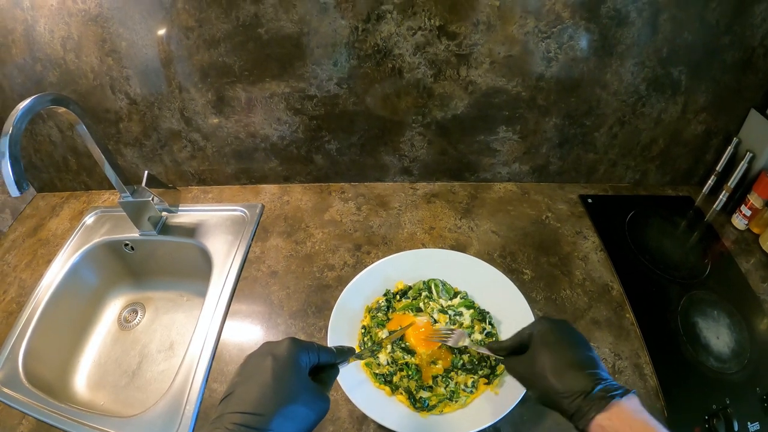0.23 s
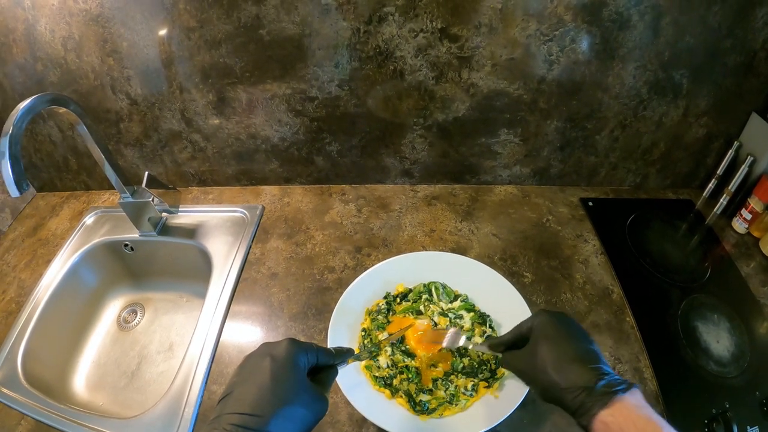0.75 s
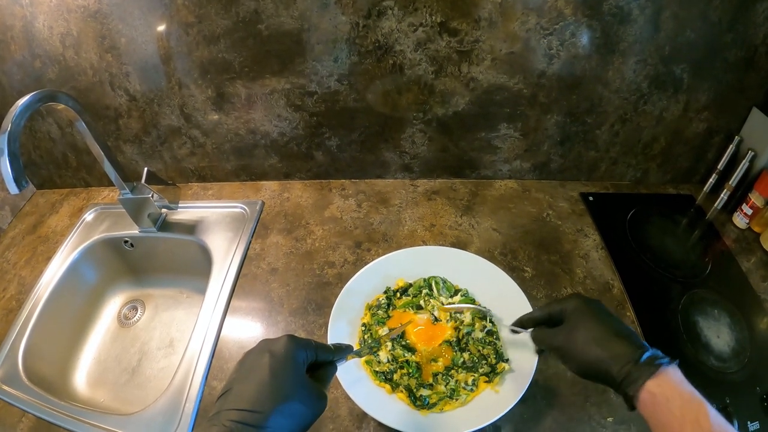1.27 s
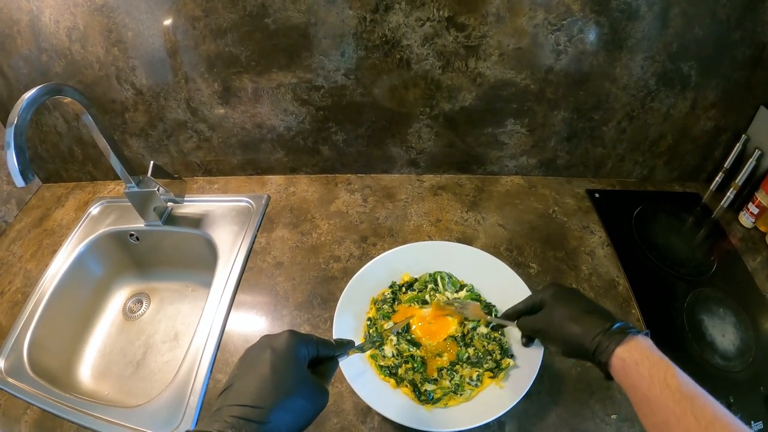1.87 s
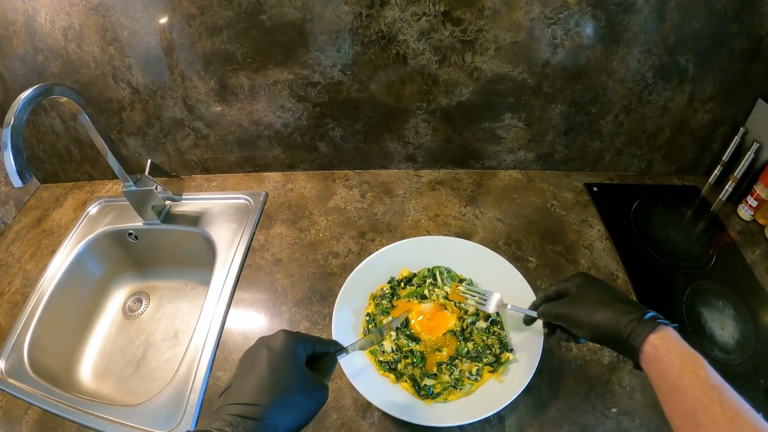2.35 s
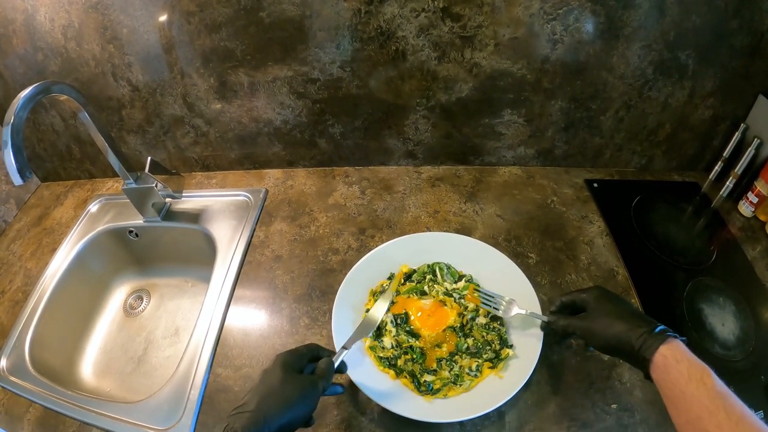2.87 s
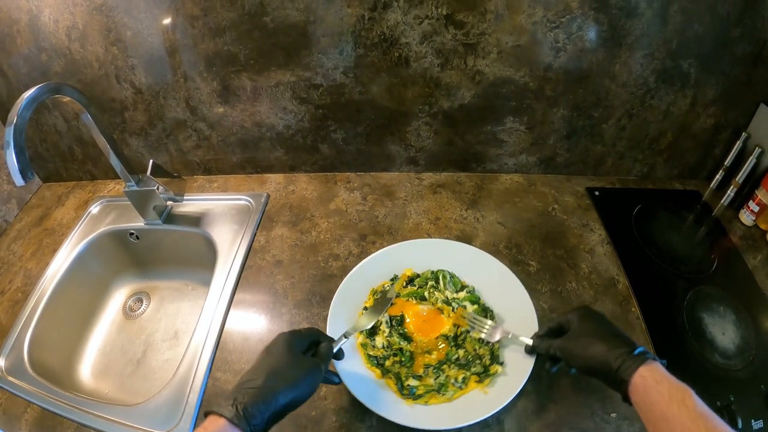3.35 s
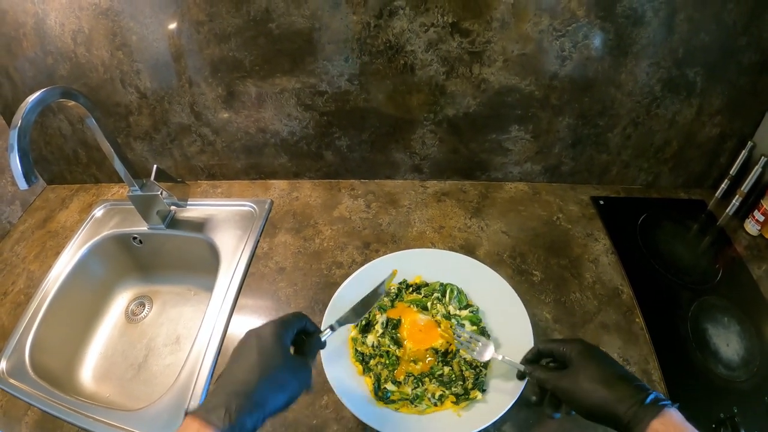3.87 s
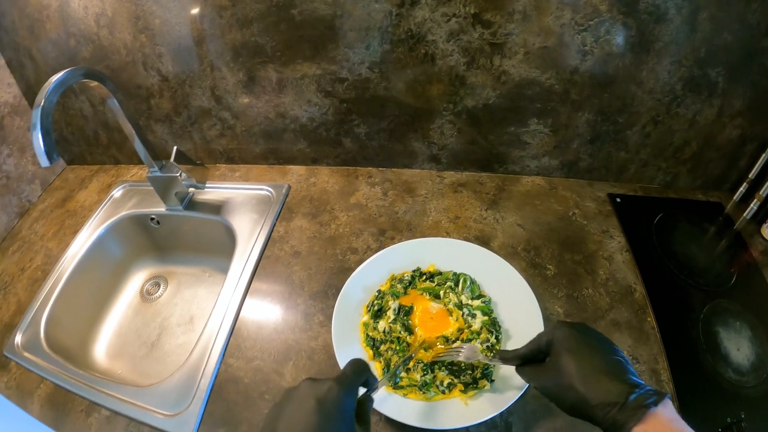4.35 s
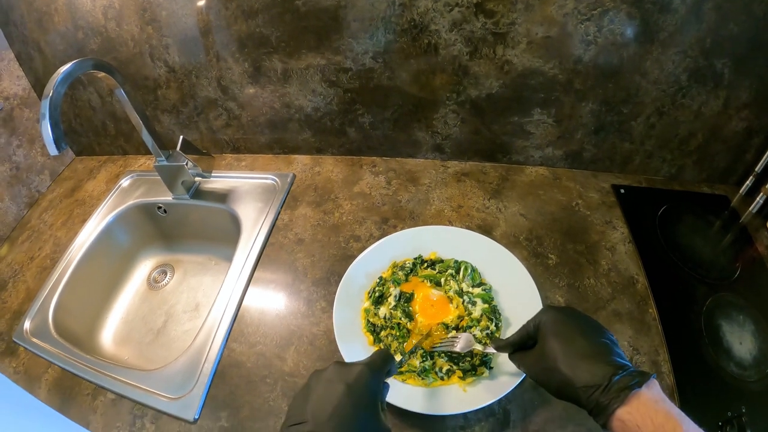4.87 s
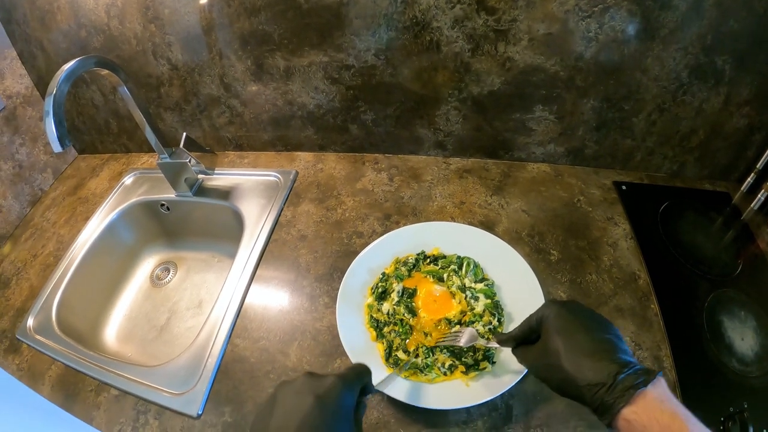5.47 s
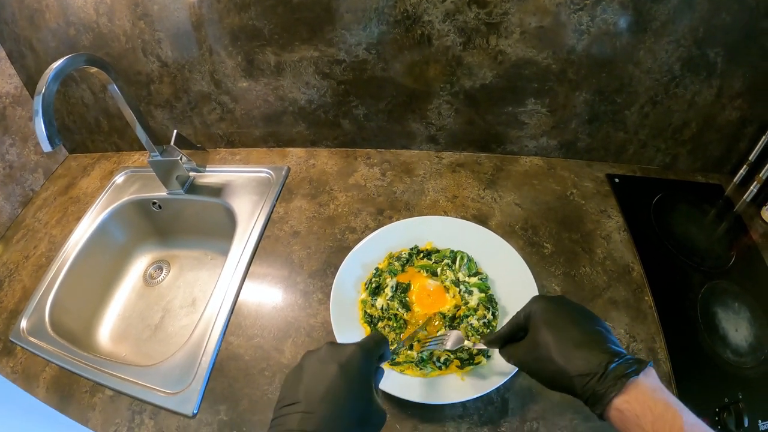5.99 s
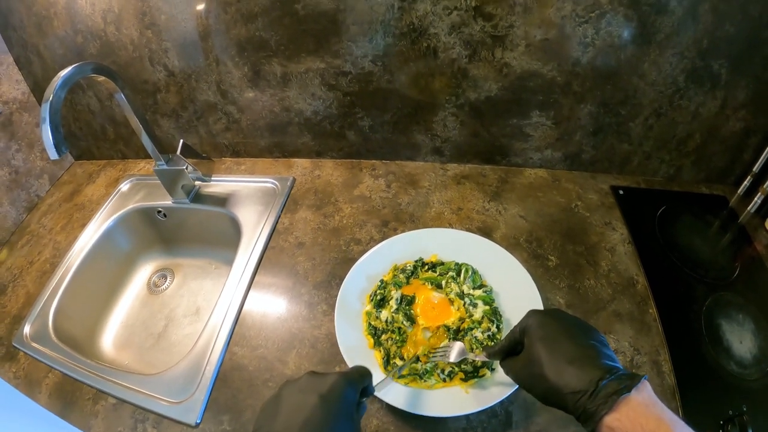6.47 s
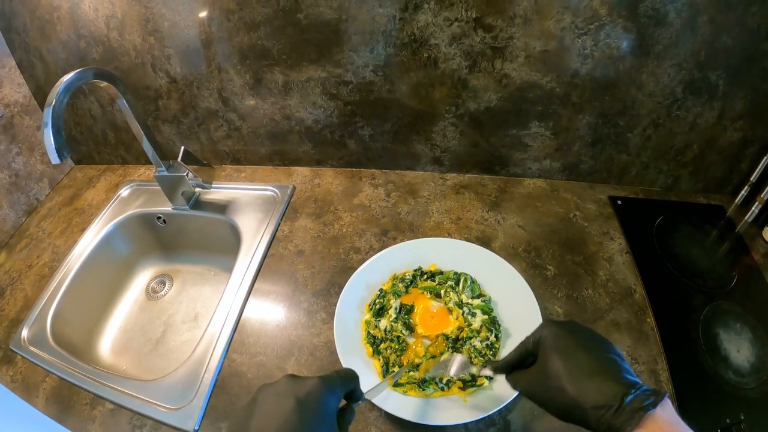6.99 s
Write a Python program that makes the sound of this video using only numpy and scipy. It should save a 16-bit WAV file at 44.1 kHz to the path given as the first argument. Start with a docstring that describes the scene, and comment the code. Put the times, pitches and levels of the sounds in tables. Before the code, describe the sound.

Close kitchen cutlery: faint wet scraping, a gritty plate shove, then sharp steel-on-china knocks and small ticks above a steady low hum.

```python
"""A fork and knife work in soft, wet food on a ceramic plate, close to two microphones in a small kitchen.
Shoves grind the plate round on the counter; later steel hits the china in three hard blows, each with a
weaker one after it. Blows ring tuned modes of plate and counter and come back from a near wall and worktop;
random slips make the grinding, squish and rasps, and short noise bursts the ticks and pops.
Behind it an appliance hums as steady tones over rumble and faint hiss."""
import sys
import numpy as np
from scipy import signal
from scipy.fft import rfft, irfft, next_fast_len
from scipy.io import wavfile

SR = 44100
rng = np.random.default_rng(int(sys.argv[2]) if len(sys.argv) > 2 else 0)


def transcribe(signal):
    """Save signal, clipped to [-1, 1], as a 16-bit WAV file at the path in sys.argv[1]."""
    frames = np.atleast_2d(signal).T
    limited = np.clip(frames, -1, 1)
    pcm = np.round(limited * 32767).astype(np.int16)
    wavfile.write(sys.argv[1], SR, pcm)


N = 318843
TIME = np.arange(N) / SR  # seconds
RING = TIME[:SR // 2]  # time axis of one struck sound, seconds
TICK_T60_S = .035  # decay of a light touch of steel on glaze


def amp(db):
    """Decibels to gain."""
    return 10 ** (np.asarray(db) / 20)


def evened(x):
    """Scales to rms 1."""
    return x / np.sqrt(np.mean(x ** 2) + 1e-20)


def sized(x, span):
    """Scales a short sound to the energy that rms 1 has over span seconds."""
    return x / np.sqrt(np.sum(x ** 2) / (span * SR) + 1e-20)


def read(points, hz):
    """Reads a table of (Hz, value) on a log-frequency axis."""
    f, value = np.transpose(points)
    return np.interp(np.log(hz + 1), np.log(f + 1), value)


def coloured(x, gain):
    """Filters by a gain that is a function of frequency."""
    size = next_fast_len(x.shape[-1], True)
    spectrum = rfft(x, size) * gain(np.fft.rfftfreq(size, 1 / SR))
    return irfft(spectrum, size)[..., :x.shape[-1]]


def low_pass(x, corner_hz, order):
    """Keeps what lies below the corner, without shifting phase."""
    return coloured(x, lambda hz: 1 / (1 + (hz / corner_hz) ** order))


def hill(centre_hz, octaves):
    """A rounded band with soft skirts."""
    def gain(hz):
        away = np.log2((hz + 1) / centre_hz) / (2 * octaves)
        return 1 / (1 + away ** 2 + away ** 4 / 2) ** 2
    return gain


def wander(rate):
    """Slow chance of rms 1, with about rate turns a second."""
    coarse = TIME[::64]
    hz = np.fft.rfftfreq(len(coarse), coarse[1])
    noise = rng.standard_normal(len(coarse))
    slow = irfft(rfft(noise) / (1 + (hz / rate) ** 4), len(coarse))
    return np.interp(TIME, coarse, evened(slow))


def grains(per_s, spread_db):
    """A random train of clicks of uneven size."""
    size = amp(spread_db * np.minimum(rng.exponential(1, N), 4))
    return evened(size * rng.standard_normal(N) * (rng.random(N) < per_s / SR))


def arch(start, length):
    """A push that swells and lets go."""
    return np.sin(np.pi * np.clip((TIME - start) / length, 0, 1))


def push(start, length, attack, release):
    """Pressure that builds from the start, holds to the end of its length and then lets go."""
    rise = np.clip((TIME - start) / attack, 0, 1)
    fall = np.clip(1 - (TIME - start - length) / release, 0, 1)
    return rise * fall


def add(mix, s, sound, pan_db=0):
    """Places a sound in the stereo mix; positive pan leans left."""
    part = mix[:, round(s * SR):][:, :len(sound)]
    part += amp([[pan_db / 2], [-pan_db / 2]]) * sound[:part.shape[1]]


def echoed(x):
    """The sound with its first reflections, delayed by the extra path to the microphone."""
    # Echoes off wall and worktop. Each row: delay in seconds, gain.
    reflections = [(.0041, 1.29), (.0058, 0.15), (.0087, 0.58), (0.0135, .25), (0.0154, 0.6)]
    return x + sum(gain * np.pad(x, (round(delay * SR), 0))[:len(x)] for delay, gain in reflections)


def decay(t60):
    """Exponential dying away by 60 dB in t60 seconds."""
    return np.exp(-np.log(1000) * RING / t60)


def mode(hz, t60):
    """One dying vibration, with the quick swell of a contact that is not quite instant."""
    swell = 1 - np.exp(-RING / 0.0002)
    return swell * np.sin(2 * np.pi * (hz * RING + rng.random())) * decay(t60)


def burst(centre_hz, octaves, t60):
    """A dying puff of noise in a rounded band."""
    return coloured(rng.standard_normal(len(RING)), hill(centre_hz, octaves)) * amp(-60 * RING / t60)


def blows():
    """A crack at the contact, the plate's modes as that spot excites them, and a thump in the counter."""
    # Steel on china. Each row: start in seconds, spot struck, force in dB, highest Hz the contact drives,
    # crack level in dB, crack centre in Hz, counter thump in dB, left over right in dB.
    strikes = [(4.878, 0, 2, 14000, -56, 2370, -48, 1.5), (5.1644, 0, -18, 2417, -78, 2180, -72.5, 2),
               (5.4587, 1, 1, 18000, -39.5, 2720, -38, 1), (5.5070, 2, -17.5, 2760, -65, 2250, -47, 4),
               (6.0775, 2, 1.5, 15100, -35, 3000, -36, 0.5), (6.138, 0, -4, 3000, -47.5, 2110, -48.5, 2.5)]
    # The plate's modes. Each row: Hz, t60 of the damping by the steel in seconds,
    # level in dB when struck at spot 0, at spot 1, at spot 2.
    plate_modes = [(611, 0.06, -47, -44, -45), (894, 0.06, -61, -56, -42), (1677, 0.06, -48, -42, -42),
                   (1787, 0.06, -37, -41, -27), (1908, 0.06, -37, -42, -34), (1992, 0.06, -44, -43, -29),
                   (2070, 0.06, -49, -46, -34), (2223, 0.06, -53, -40, -47), (2541, 0.06, -61, -40, -44),
                   (2608, 0.06, -67, -39, -55), (2689, 0.06, -61, -40, -42), (2762, 0.06, -59, -40, -40),
                   (2834, 0.06, -54, -41, -40), (2947, 0.06, -55, -47, -40), (3846, 0.06, -55, -38, -43),
                   (3957, 0.06, -54, -43, -47), (4091, 0.06, -54, -53, -41), (4212, 0.06, -43, -39, -37),
                   (4395, 0.06, -46, -27, -34), (4527, 0.06, -61, -39, -49), (4710, 0.06, -61, -44, -41),
                   (5041, 0.06, -50, -41, -32), (6611, 0.05, -56, -45, -52), (6767, 0.05, -54, -49, -43),
                   (6961, 0.05, -56, -42, -45), (7192, 0.05, -61, -53, -46), (8506, 0.05, -74, -45, -49),
                   (8834, 0.05, -66, -57, -45), (10785, 0.05, -72, -50, -54), (11189, 0.05, -62, -53, -56)]
    # The plate rocking on the counter. Each row: Hz, t60 in seconds, relative level in dB.
    counter_modes = [(188.7, 0.11, 1), (316.5, 0.11, 2), (384, 0.12, -2.5), (421.6, 0.18, 2.5),
                     (464, 0.14, 1.5), (714, .12, -22), (1337, .15, -9.5)]
    shimmer_db = -12.5  # against the crack
    out = np.zeros((2, N))
    for s, spot, force_db, hard_hz, crack_db, crack_hz, thump_db, pan_db in strikes:
        ring = 0
        for hz, t60, *spot_db in plate_modes:
            # the steel damps the plate while they touch; what is left rings on freely
            free_t60 = 0.29 * (2000 / max(hz, 2000)) ** .6
            damping = amp(-28.0) + decay(t60)
            # a soft contact cannot drive the high modes
            weight = amp(force_db + spot_db[spot]) / np.sqrt(1 + (hz / hard_hz) ** 4)
            ring = ring + weight * sized(echoed(mode(hz, free_t60) * damping), span=0.022)
        crack = sized(echoed(burst(crack_hz, octaves=0.98, t60=.016)), span=0.037)
        # a dense noisy shimmer, the room's answer to the crack, dies away under the ringing modes
        shimmer = amp(shimmer_db) * sized(burst(3500, octaves=.9, t60=0.21), span=0.023)
        rocking = sum(amp(db) * mode(hz, t60) for hz, t60, db in counter_modes)
        thump = sized(rocking * (1 - np.exp(-RING / 0.011)), span=0.025)
        add(out, s, ring + amp(crack_db) * (crack + shimmer) + amp(thump_db) * thump, pan_db)
    return out


def cutlery():
    """The tines ring briefly, damped by the hand; lighter contacts only tick, and short slides rasp."""
    # The fork's tines. Each row: Hz, relative level in dB, t60 in seconds.
    tine_modes = [(2850, 10, 0.026), (3040, -14, .035), (6020, -2, 0.037), (6260, -1.5, .045),
                  (6720, 1, 0.033), (7600, -10, 0.045), (8450, -19, 0.046), (11840, -11, 0.022)]
    # Knife against fork. Each row: start in seconds, ringing tines in dB, contact click in dB.
    tings = [(6.2860, -39.5, -49), (6.328, -66, -55), (6.371, -51, -52)]
    # Steel touches the glaze lightly. Each row: start in seconds, level in dB, centre in Hz, width in octaves.
    ticks = [(1.4961, -64, 4670, .24), (1.5192, -63.5, 3930, 0.51), (2.533, -59, 5240, 0.23),
             (2.689, -59, 5010, 0.33), (2.7809, -70, 4330, 0.24), (2.842, -62.5, 4720, 0.38),
             (3.2904, -69, 5270, 0.41), (6.3326, -49.5, 2050, 0.25), (6.4403, -58.5, 2740, 0.33),
             (6.5397, -57, 2450, 0.73), (6.65, -64, 4380, 0.32), (6.8417, -63, 2330, .26),
             (6.991, -65.5, 4550, 0.41), (7.0741, -50, 6880, 0.18)]
    # Steel slides on the glaze. Each row: start in seconds, length in seconds, centre in Hz, level in dB.
    slides = [(1.468, 0.064, 4200, -75), (4.186, 0.07, 3620, -56), (6.432, 0.021, 3200, -57)]
    out = np.zeros((2, N))
    for s, tines_db, click_db in tings:
        tines = sized(sum(amp(mode_db) * mode(hz, t60) for hz, mode_db, t60 in tine_modes), span=0.013)
        click = sized(burst(5260, octaves=0.51, t60=0.031), span=0.013)
        add(out, s, amp(tines_db) * tines + amp(click_db) * click)
    for s, db, centre_hz, octaves in ticks:
        add(out, s, amp(db) * sized(burst(centre_hz, octaves, TICK_T60_S), span=0.021), pan_db=1.0)
    slips = grains(per_s=3000, spread_db=1.5)
    for s, length, centre_hz, db in slides:
        out += amp(db) * arch(s, length) * evened(coloured(slips, hill(centre_hz, octaves=0.58)))
    return out


def food():
    """Wet food tears and smears: a soft squish, finer bursting films above it, stray ticks and larger pops."""
    # Fork or knife presses through the food.
    # Each row: start in seconds, length in seconds, squish in dB, wet fizz in dB; both are trimmed below.
    strokes = [(1.28, 0.2, -67.5, -73), (2.355, 0.46, -60, -67.5), (2.815, 0.33, -66, -63.5),
               (3.837, 0.37, -59.5, -76), (4.14, 0.76, -65, -78), (5.066, 0.14, -60.5, -72),
               (5.242, 0.14, -63, -75.5), (5.52, 0.068, -74, -60), (6.02, 0.097, -60.5, -85.5),
               (6.49, 0.15, -66.5, -86), (6.688, 0.076, -75, -60.5), (6.78, 0.086, -61.5, -78),
               (6.998, .11, -64.5, -79)]
    # A wet film of food snaps. Each row: start in seconds, level in dB, centre in Hz.
    pops = [(1.9683, -75, 8500), (2.0526, -73.5, 9800), (2.261, -66, 11300), (5.0977, -56, 11300),
            (5.1219, -61, 8000), (5.3104, -68, 7000), (5.3363, -76, 10020)]
    rise_share, fall_share = .45, 0.49  # of the stroke's length: a long stroke builds and eases slowly
    stray_per_s, stray_db, stray_hz = 7, -5, 5000  # faint ticks during strokes; level follows the squish
    squish, fizz = np.zeros((2, N))
    for start, length, squish_db, fizz_db in strokes:
        pressure = push(start, length, rise_share * length, fall_share * length)
        squish += amp(squish_db) * pressure
        fizz += amp(fizz_db) * pressure
    smear = evened(coloured(grains(per_s=6600, spread_db=-0.5), hill(4600, octaves=0.79)))
    films = evened(coloured(grains(per_s=1300, spread_db=2.5), hill(6800, octaves=1.0)))
    touches = squish * rng.uniform(.4, 1, N) * (rng.random(N) < stray_per_s / SR)
    tick = sized(burst(stray_hz, octaves=.45, t60=TICK_T60_S), span=0.013)
    strays = signal.oaconvolve(touches, tick)[:N]
    unevenness = amp(1.2 * wander(rate=15))
    wet = unevenness * (amp(-7) * squish * smear + amp(-8.5) * fizz * films)
    out = (wet + amp(stray_db) * strays) * np.ones((2, 1))
    for s, db, centre_hz in pops:
        add(out, s, amp(db) * sized(burst(centre_hz, octaves=.55, t60=.02), span=0.017), pan_db=3.5)
    return out


def turning():
    """Grit under the foot ring slips in dense tiny jerks that drive the resonances of plate and counter."""
    # The hand shoves the plate round on its foot.
    # Each row: start in seconds, length in seconds, level in dB before it sags.
    shoves = [(3.314, 0.37, -38.5), (3.577, 0.24, -38), (3.783, 0.073, -42)]
    # Broad colour of the grinding. Each row: Hz, relative level in dB.
    grind_colour = [(150, -40), (250, -29), (448, -1), (620, -16.5), (888, -20), (1040, -4), (1320, -3.5),
                    (2660, -7.5), (3160, -14), (4300, -20.5), (5650, -17.5), (9610, -36.5), (15000, -72)]
    # Resonances of plate and counter. Each row: Hz, least width in Hz, relative level in dB.
    grind_peaks = [(328, 23, -4), (732, 18, -4), (894, 77, 0), (1320, 26, -1), (1650, 48, -3),
                   (2650, 50, -4), (3550, 160, -10), (3950, 47, -16), (4200, 17, -8), (4390, 41, -6),
                   (4710, 56, -15), (5070, 65, -9), (6140, 68, -13), (6670, 150, -15), (7880, 89, -15),
                   (9290, 88, -17), (10700, 29, -27), (11800, 61, -30)]
    # The foot catches and one resonance sings.
    # Each row: start in seconds, length in seconds, Hz, level in dB.
    catches = [(3.349, 0.13, 897, -40), (3.6, 0.087, 1320, -51), (3.808, 0.048, 732, -41.5),
               (3.809, 0.068, 4400, -43)]
    attack_s, release_s = 0.024, 0.047
    sag_db_per_s = 17  # friction eases once the plate is moving
    start_s = 0.083  # the plate at rest takes this long to get up to speed
    grit_db = -7  # treble grit against the body of the grinding
    efforts = []
    for s, length, db in shoves:
        sagging_db = db - sag_db_per_s * np.maximum(TIME - s, 0)
        efforts.append(push(s, length, attack_s, release_s) * amp(sagging_db))
    effort = np.max(efforts, axis=0)
    speed = np.clip((TIME - shoves[0][0]) / start_s, 0, 1)
    jerks = grains(per_s=5000, spread_db=0.0) * amp(1.64 * wander(rate=28))
    broad = evened(coloured(jerks, lambda hz: amp(read(grind_colour, hz))))
    # as the contact travels round the rim, groups of resonances take turns
    sharp = 0
    for k in range(3):
        def resonances(hz):
            return sum(amp(db) / (1 + 2j * (hz - f) / max(width, .012 * f))
                       for f, width, db in grind_peaks[k::3])
        sharp = sharp + coloured(jerks, resonances) * amp(3.3 * wander(rate=9.5))
    rub = evened(broad + amp(-2.0) * evened(sharp))
    body = low_pass(rub, 3000, order=8)
    grit = low_pass(rub - body, 13000, order=8)
    out = effort * speed * (evened(body) + amp(grit_db) * evened(grit))
    for start, length, hz, db in catches:
        song = np.sin(2 * np.pi * hz * TIME + 1.0 * wander(rate=47))
        out += amp(db) * arch(start, length) * song
    return out * amp([[.1], [-.1]])  # a hair to the left


def room(x, likeness):
    """A diffuse tail of sparse taps, each band dying at its own speed; likeness is what left and right share."""
    # Decay of the kitchen. Each row: Hz, t60 in seconds.
    room_t60 = [(200, 0.28), (800, 0.68), (2000, 0.57), (4500, 0.42), (8000, 0.36), (14000, 0.18)]
    taps = rng.choice([-1., 1.], (3, SR)) * (rng.random((3, SR)) < 4000 / SR)
    pair = np.sqrt(likeness) * taps[0] + np.sqrt(1 - likeness) * taps[1:]
    hz, t, z = signal.stft(pair, SR, nperseg=256)
    tail = signal.istft(z * amp(-60 * t / read(room_t60, hz)[:, None]), SR, nperseg=256)[1]
    tail = np.pad(tail, ((0, 0), (round(.008 * SR), 0)))  # the tail sets in after 8 ms
    return signal.fftconvolve(x, tail / np.linalg.norm(tail[0]), axes=1)[:, :N]


def noise_pair(spectrum):
    """Steady room noise of rms 1: the two microphones share its bass and less of its treble."""
    # Likeness of the noise at the two microphones. Each row: Hz, shared part of the power from 0 to 1.
    noise_likeness = [(60, .99), (130, .96), (290, .88), (640, .7), (1400, .57), (3100, .45), (7000, .6),
                      (15000, .45)]
    shared, left, right = rng.standard_normal((3, N))
    common = coloured(shared, lambda hz: np.sqrt(read(noise_likeness, hz)))
    separate = coloured(np.array([left, right]), lambda hz: np.sqrt(1 - read(noise_likeness, hz)))
    return evened(coloured(common + separate, lambda hz: amp(read(spectrum, hz))))


def kitchen():
    """Mains hum and wavering motor tones over a slowly swelling rumble and faint hiss."""
    # Steady tones of the appliance. Each row: Hz, rms level in dB.
    hum_tones = [(99.9, -49), (199.8, -66), (328, -62), (458, -70), (1033, -69.5), (1082, -74.5),
                 (1278, -79), (1916, -83)]
    # Colour of the rumble. Each row: Hz, relative level in dB.
    rumble_colour = [(15, -13), (24, -7), (30, 2), (39, 1), (57, 1.5), (80, -5.5), (130, -9.5), (210, -4.5),
                     (270, -13), (325, -5.5), (400, -17), (520, -28.5), (700, -60), (1500, -86.5)]
    # Colour of the faint hiss. Each row: Hz, relative level in dB.
    air_colour = [(290, -32), (500, -7), (847, -17.5), (1050, -7), (1140, -9), (1300, -13), (1630, -20),
                  (1880, -17), (2430, -27.5), (2800, -24), (3270, -33.5), (4600, -29), (6860, -31),
                  (15000, -61)]
    hum = 0
    for hz, db in hum_tones:
        level = np.sqrt(2) * amp(db + 0.29 * wander(rate=9))
        waver = 0.011 * np.sqrt(hz) * wander(rate=2.2)  # radians
        hum = hum + level * np.sin(2 * np.pi * hz * TIME + waver)
    rumble = amp(-48.0) * noise_pair(rumble_colour) * amp(0.83 * wander(rate=4.9))
    # the deepest rumble swells and sinks at random
    deep = low_pass(rumble, 72, order=10)
    swell = amp(-52.5 + 3.5 * wander(rate=2.5))
    return hum + rumble - deep + swell * evened(deep) + amp(-63.5) * noise_pair(air_colour)


def scene():
    """Everything on the plate, its room sound, and the kitchen's hum."""
    struck, grind, small = blows(), turning(), cutlery() + food()
    tail = room(amp(-10.5) * struck + amp(-10) * grind + amp(-8.5) * small, likeness=0.38)
    return struck + grind + small + tail + kitchen()


def record(dry):
    """Two close microphone ports differ a little in phase and level and dull the top; then the band limit."""
    # Phase lead of the left microphone over the right. Each row: Hz, radians.
    left_lead = [(50, -.03), (300, -0), (1000, -0.6), (2600, -0.64), (4100, -1), (6000, -0.5), (12000, 0)]
    # Level of the left microphone over the right. Each row: Hz, dB.
    left_lean = [(200, 0), (650, 1.5), (1200, -.3), (4400, -.3), (8000, .3), (14000, -.5)]
    side = np.array([[.5], [-.5]])  # each port takes half the difference

    def port(hz):
        return amp(side * read(left_lean, hz)) * np.exp(1j * side * read(left_lead, hz))
    ports = coloured(dry, port)
    soft = coloured(ports, lambda hz: 1 / np.sqrt(1 + (hz / 13000) ** 20))
    band_limit = signal.firwin(511, 15400, window=("kaiser", 9), fs=SR)
    return signal.oaconvolve(soft, band_limit[None], "same")


dry = scene()
out = record(dry)
transcribe(out)
```